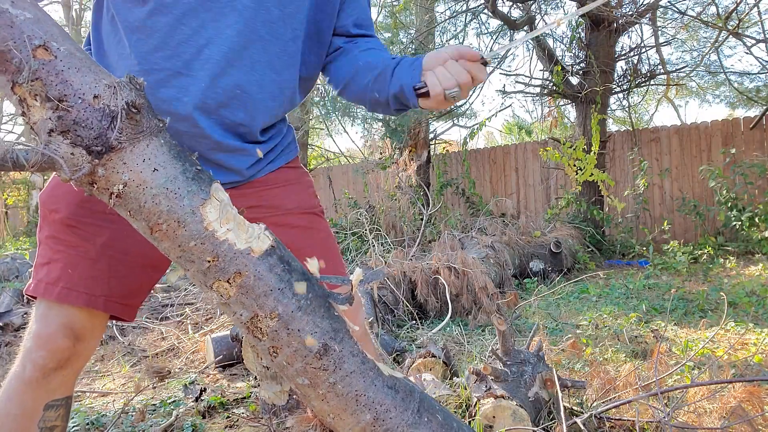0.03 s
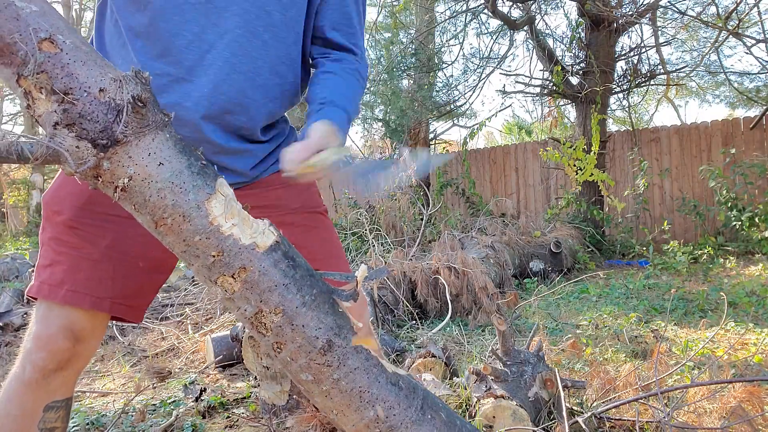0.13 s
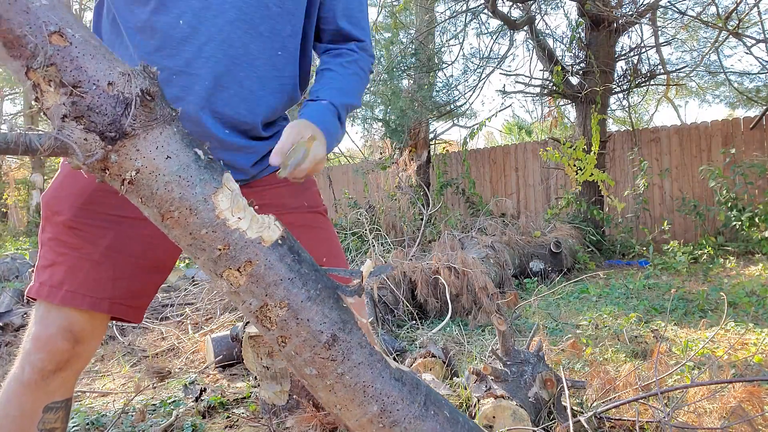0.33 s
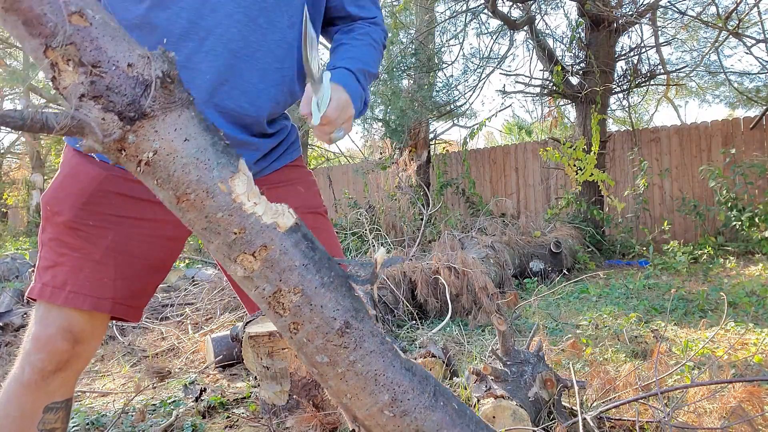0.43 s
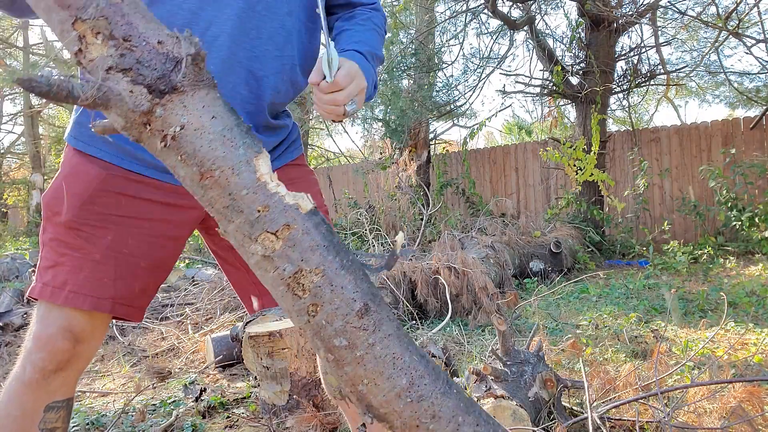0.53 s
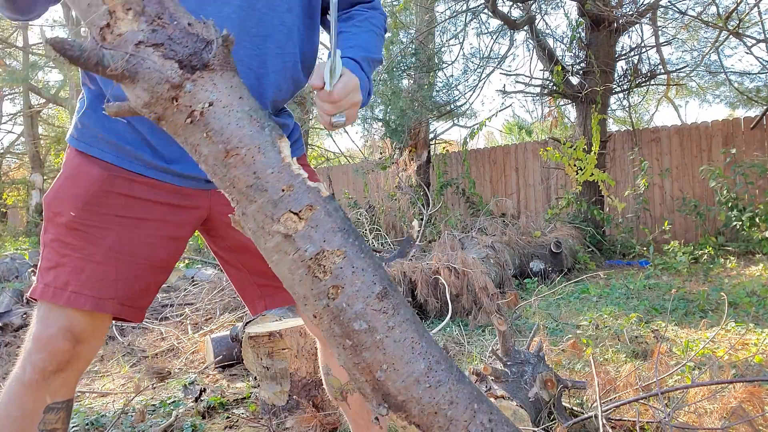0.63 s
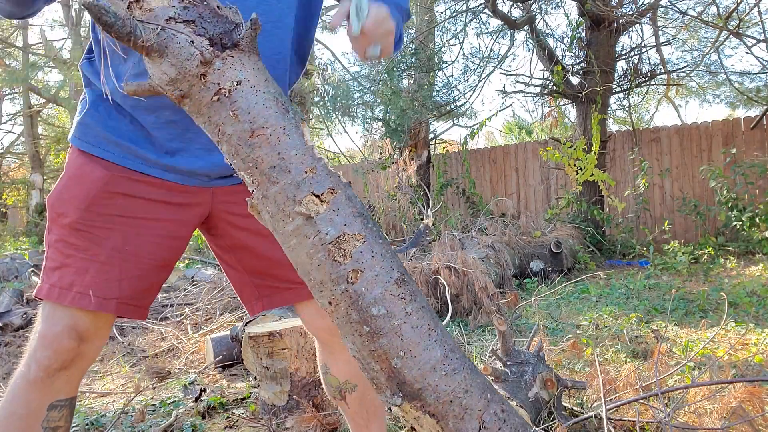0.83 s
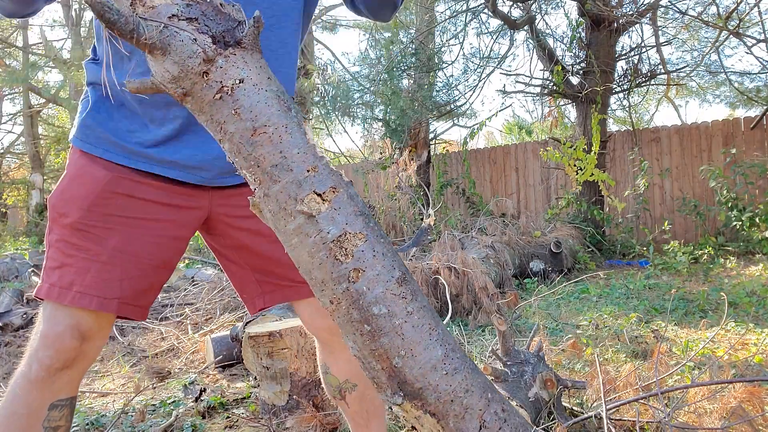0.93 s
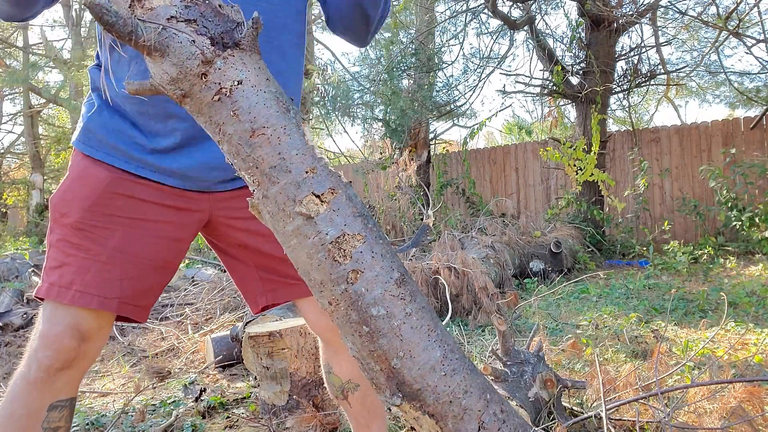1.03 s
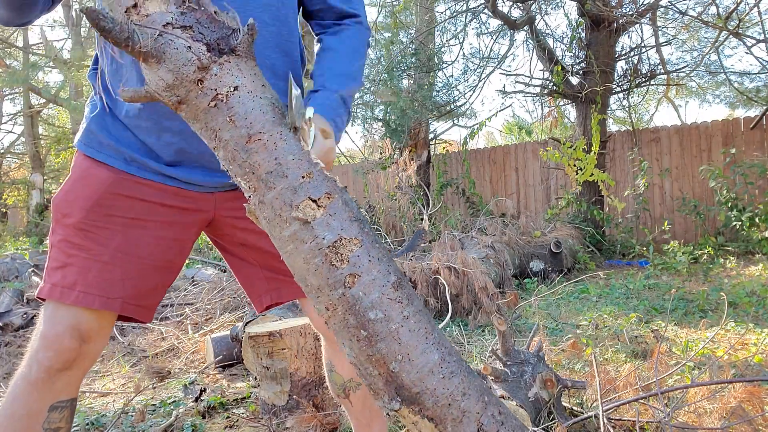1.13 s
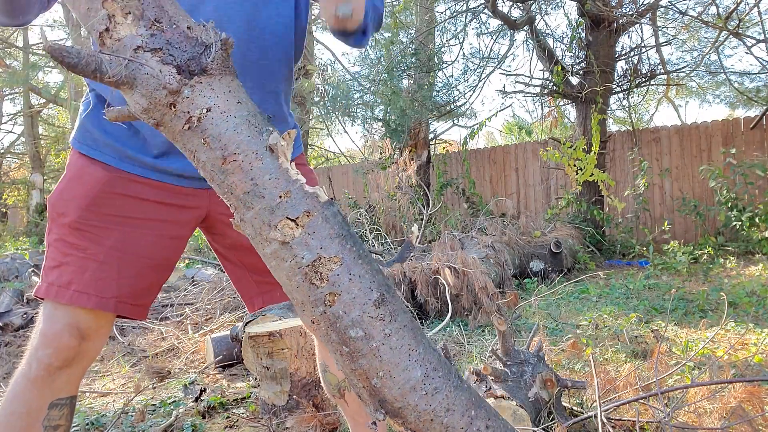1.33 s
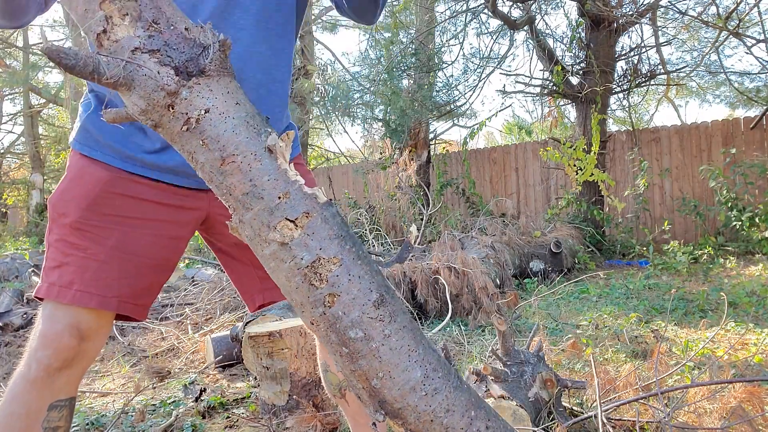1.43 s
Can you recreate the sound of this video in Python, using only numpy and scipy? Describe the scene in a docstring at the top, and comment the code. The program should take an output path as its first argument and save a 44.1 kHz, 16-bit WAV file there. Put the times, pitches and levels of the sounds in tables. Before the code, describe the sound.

A heavy knife blade chops into a log with a sharp splitting crack and short clank, chips and clothing rustle faintly, then a second chop lands; close stereo microphone, quiet backyard with a quick fence slap.

```python
"""A large knife chops twice into a leaning log in a back yard, heard from close by.
Each blow is a burst of tiny clicks (splitting fibres) plus fading tones (the ringing blade and log).
Soft noise swells up just before each blow; a fence slaps the blow back and the yard scatters it.
Shaped grains make the pattering chips and rustling clothes between the blows.
Noise held near two low pitches makes a distant hum, and shaped noise makes faint outdoor air."""
import sys
import numpy as np
from scipy import signal
from scipy.fft import rfft, irfft
from scipy.io import wavfile
from scipy.ndimage import uniform_filter1d

SR = 44100
rng = np.random.default_rng(int(sys.argv[2]) if len(sys.argv) > 2 else 0)


def generate_wav(signal):
    """Clip the signal to [-1, 1] and save it as 16-bit WAV at the path in sys.argv[1]."""
    frames = np.transpose(np.atleast_2d(signal))
    scaled = np.clip(frames, -1, 1) * 32767
    pcm = np.round(scaled).astype(np.int16)
    wavfile.write(sys.argv[1], SR, pcm)


N = 66150  # length in samples: 1.5 s
T = np.arange(N) / SR  # time in seconds

# A t60 is the time a sound takes to fade by 60 dB. A pan is left minus right in dB.
# Colour tables give relative strength; sounds are set to their level afterwards.

# Distant hum: pitch_hz, width_hz, level_db
HUM_TONES = [(60.65, 6.5, -53), (121.6, 7.2, -63)]
# Colour of the outdoor air: pitch_hz, level_db (per Hz)
AIR_COLOUR = [(20, -7), (70, 0.5), (200, -12.5), (400, -24.5), (1000, -27.5), (2200, -28.5), (3800, -33),
              (5800, -30), (9500, -41.5), (13000, -33), (15500, -32.5)]
AIR_DB, AIR_WIDE_HZ, AIR_SWELL_DB = -55, 900, -1.18

# Rustles of clothes and dry litter: start_s, length_s, level_db, pan_db, tilt_db (per octave)
RUSTLE_EVENTS = [(.005, 0.13, -60, -2, -8.5), (0.501, 0.28, -56, 1.5, -3), (0.75, 0.22, -60, -3.5, -6),
                 (1.011, 0.24, -58.5, 0, -8), (1.339, 0.038, -53.5, -1.5, -10)]
# Colour of a rustle before its tilt: pitch_hz, level_db (per Hz)
RUSTLE_COLOUR = [(100, -75), (700, -33), (3800, -10.5), (5500, -2.5), (7500, -3), (9500, -13), (13000, 4.5),
                 (15500, -1)]
RUSTLE_ATTACK_S, RUSTLE_GRAINS_PER_S, RUSTLE_SPREAD_DB = 0.0073, 7000, 5
FLUTTER_DB = 2.5
SMALL_WIDTH = 0.92  # stereo width of rustles and chips

# Faint ring of the lifted blade: start_s, pitch_hz, width_hz, level_db, t60_s
LIFTED_BLADE_RING = (.015, 1990, 600, -63.5, .45)

# Chips landing and bark snapping: start_s, level_db, pan_db, t60_s, pitch_hz
CHIP_EVENTS = [(.057, -40.5, -5, 0.015, 1970), (.287, -66, 4, 0.025, 2140), (0.302, -56, 0, 0.065, 1420),
               (0.3288, -46.5, 9.5, 0.035, 7300), (0.4606, -52.5, -2, 0.024, 7930),
               (0.5157, -53, 4, 0.21, 6560), (0.7258, -48.5, -2, .013, 7100), (0.7546, -48, 5, 0.046, 6940),
               (0.823, -44, 3, 0.036, 5500), (1.0085, -36.5, -2.5, 0.016, 5200),
               (1.0188, -41.5, -3.5, 0.063, 4960), (1.05, -47.5, -3, 0.11, 6340),
               (1.119, -52, -2, 0.044, 5000), (1.288, -53, 7, 0.031, 3150), (1.363, -49.5, 9, 0.052, 6550),
               (1.37, -44.5, -13, 0.026, 5170)]
# Colour of a chip before its own ring: pitch_hz, level_db (per Hz)
CHIP_COLOUR = [(1000, -19), (2600, 5.5), (7500, 1.5), (9500, -6), (13000, 5)]
CHIP_RING_DB, CHIP_RING_OCTAVES = 14, 0.2  # height of the ring's peak, reach to either side

# Colour of the soft noise around each blow: pitch_hz, level_db (per Hz)
LEAD_IN_COLOUR = [(100, -7), (3200, -1), (10000, -14.5), (15000, -7)]
LEAD_IN_DB, LEAD_IN_RISE_S, LEAD_IN_STOP_S = -33, 0.0096, 0.0031

# Knife blows: start_s, crack_db, log_db, blade_db, echo_db, place (along the cut, 0 to 1),
# lag_s (until the log moves), grip_s (until the wood grips the edge), echo_s (until the fence answers)
BLOW_EVENTS = [(.2236, -14, -20.5, -17.5, -20.5, 0, .0001, 0.021, .0229),
               (1.1782, -13, -19, -19, -16.5, 0.98, 0.00097, .008, .0234)]
# Tones of the log: pitch_hz, t60_s, near_db (struck at one end of the cut), far_db (at the other)
LOG_MODES = [(125.4, 0.19, -7, -13), (199.5, 0.063, 1, -14), (250.8, 0.15, -10.5, -17.5),
             (312, 0.15, -11.5, -7.5), (360.5, 0.092, -2.5, 0.86), (368.3, 0.078, 8, -3),
             (518, 0.15, -5.5, -26.5), (557.3, 0.11, -5.5, -0.8), (755, 0.096, -3.5, -6.5),
             (847.4, 0.095, -5.5, -6), (862, 0.14, -15, -12), (947, 0.034, 5.5, 0.5),
             (1093, 0.022, 5.5, -7.5), (1134, 0.051, 1, -2.5), (1403, 0.066, -15.5, -6)]
# Tones of the blade, damped by the wood: pitch_hz, t60_s, near_db, far_db (ends of the cut)
BLADE_MODES = [(1572, 0.028, -3.5, -18.5), (1954, 0.03, 2.5, -4), (2068, 0.028, 4.5, 3.5),
               (2527, 0.035, -2, 0), (3021, 0.052, -18.5, 0.5), (3312, 0.04, -3, 4.5),
               (3627, 0.056, -6.5, -1.5), (4350, 0.021, 3, -6.5), (6750, 0.016, 1.5, 6.5)]
# Colour of the splitting fibres: pitch_hz, level_db (per Hz)
CRACK_COLOUR = [(60, -38.5), (300, -6.5), (650, -11), (950, -3), (1400, -12), (2200, 0), (4000, -5.5),
                (7300, -5.5), (9500, -18), (15500, -12)]
RISE_S, BITE_S, CRACK_T60_S = 0.0013, 0.0013, 0.033  # build-up, full-strength hold, then fade
GRAINS_PER_S, GRAIN_SPREAD_DB = 12000, 2.5
CRACK_WIDTH, BLADE_WIDTH, BLOW_PAN_DB = 0.82, 0.33, -1
LOG_PUSH_S = 0.00077  # how gradually the log is set moving
WAVER_HZ, WAVER_S = 60, 0.06  # bandwidth of the pitch waver, time it takes to grow

# Scatter from further stretches of fence: delay_s (after the slap), t60_s (smear), level_db
FENCE_ECHOES = [(.002, 0.082, -1.5), (0.032, 0.098, -11.5)]
FENCE_LOW_HZ, SLAP_DB = 695, 1

# Colour of the yard's scatter: pitch_hz, level_db
YARD_COLOUR = [(100, 6), (300, 2.5), (1500, 7.5), (2500, -2.5), (6500, -5), (10000, -11), (15000, 1)]
YARD_DB, YARD_T60_S, YARD_ONSET_S = -21.5, 0.29, 0.028
GROUND_DB, GROUND_T60_S, GROUND_TILT_DB = -10, 0.11, -1.25  # tilt is per octave
KNOCK_SCATTER_DB = -13  # how much of the log's knock reaches the yard

TOP_HZ, CEILING = 15850, 0.9  # highest pitch kept, peak limit


def undb(db):
    """Turn decibels into a multiplying gain."""
    return 10 ** (np.asarray(db) / 20)


def unit(x):
    """Scale a sound to an average strength (rms) of 1."""
    return x / np.sqrt(np.mean(x ** 2) + 1e-18)


def fade(t, t60):
    """Silence before t = 0, then a steady fade in dB."""
    return (t >= 0) * np.exp(-np.log(1000) * np.maximum(t, 0) / t60)


def pan(db):
    """Left and right gains for a level difference."""
    return undb(np.array([[db], [-db]]) / 2)


def spread(mid, side, width):
    """Build left and right from a shared part and an opposed part."""
    opposed = width * side * np.array([[1], [-1]])
    return (mid + opposed) / np.sqrt(1 + width ** 2)


def colour(x, points, tilt_db=0):
    """Filter a sound by (Hz, dB) points and a tilt per octave."""
    hz, db = np.array(points).T
    octave = np.log2(np.maximum(np.fft.rfftfreq(N, 1 / SR), 1))
    tilt = tilt_db * np.clip(octave, np.log2(hz[0]), None)
    gain_db = np.interp(octave, np.log2(hz), db) + tilt
    return irfft(rfft(x) * undb(gain_db), N)


def grains(rate, spread_db):
    """Make tiny clicks of uneven size at random moments."""
    hits = rng.random(N) < rate / SR
    signs = rng.choice([-1, 1], N)
    size_db = spread_db * np.minimum(rng.exponential(size=N), 4)
    return hits * signs * undb(size_db)


def crackle(points, rate, spread_db, width, tilt_db=0):
    """Make coloured stereo grains with an rms of 1."""
    shared, opposed = grains(rate, spread_db), grains(rate, spread_db)
    return unit(colour(spread(shared, opposed, width), points, tilt_db))


def narrow(hz, width):
    """Make noise held near one pitch, with an rms of 1."""
    f = np.fft.rfftfreq(N, 1 / SR)
    random_phase = np.exp(2j * np.pi * rng.random(len(f)))
    peak = 1 / (1 + (2 * (f - hz) / width) ** 2)
    return unit(irfft(random_phase * peak, N))


def convolve(x, response):
    """Pass a sound through an echo pattern of unit energy."""
    return signal.fftconvolve(x, unit(response) / np.sqrt(N), axes=-1)[:, :N]


def late(x, seconds):
    """Delay a sound, even by part of a sample, by turning its phases."""
    f = np.fft.rfftfreq(N, 1 / SR)
    return irfft(rfft(x) * np.exp(-2j * np.pi * f * seconds), N)


def outdoors():
    """Wavering hum and soft, swelling air: centred in the bass and wide in the treble."""
    f = np.fft.rfftfreq(N, 1 / SR)
    hum = sum(undb(db) * narrow(hz, width) for hz, width, db in HUM_TONES)
    mid, side = rng.standard_normal((2, N))
    side = irfft(rfft(side) * np.clip(f / AIR_WIDE_HZ, 0.25, 1), N)
    swell = np.interp(T, np.linspace(0, T[-1], 16), rng.standard_normal(16))
    air = unit(colour(spread(mid, side, width=1.0), AIR_COLOUR))
    return hum + undb(AIR_DB + AIR_SWELL_DB * swell) * air


def rustles():
    """Rubbing cloth and litter shed tiny clicks: each movement starts fast, flutters and dies away."""
    out = 0
    for start, length, db, pan_db, tilt_db in RUSTLE_EVENTS:
        corners = [0, RUSTLE_ATTACK_S, RUSTLE_ATTACK_S + length]
        effort = np.sqrt(np.interp(T - start, corners, [0, 1, 0]))
        flutter = unit(uniform_filter1d(rng.standard_normal(N), size=500))
        effort = effort * undb(FLUTTER_DB * flutter)
        rub = crackle(RUSTLE_COLOUR, RUSTLE_GRAINS_PER_S, RUSTLE_SPREAD_DB, SMALL_WIDTH, tilt_db)
        out = out + undb(db) * pan(pan_db) * effort * rub
    return out


def lifted_blade():
    """The lifted blade rings faintly: noise held near one pitch that dies away."""
    start, hz, width, db, t60 = LIFTED_BLADE_RING
    return undb(db) * fade(T - start, t60) * narrow(hz, width)


def chips():
    """Small dry ticks of wood and bark; each piece rings at a pitch set by its size."""
    grit = crackle(CHIP_COLOUR, rate=5800, spread_db=5, width=SMALL_WIDTH)
    out = 0
    for start, db, pan_db, t60, hz in CHIP_EVENTS:
        reach = 2 ** CHIP_RING_OCTAVES
        body = [(hz / reach, 0), (hz, CHIP_RING_DB), (hz * reach, 0)]
        tick = fade(T - start, t60) * unit(colour(grit, body))
        out = out + undb(db) * pan(pan_db) * tick
    return out


def lead_ins():
    """Soft noise swells up just before each blow and stops quickly after it."""
    swell = 0
    for blow in BLOW_EVENTS:
        before, after = (blow[0] - T) / LEAD_IN_RISE_S, (T - blow[0]) / LEAD_IN_STOP_S
        swell = swell + np.exp(-np.maximum(before, after))
    hiss = unit(colour(spread(*rng.standard_normal((2, N)), width=0.83), LEAD_IN_COLOUR))
    return undb(LEAD_IN_DB) * swell * hiss


def ring(modes, t, place, width):
    """Fading, wavering tones of a struck body; the place of the blow sets how strong each one is."""
    out = 0
    for k, (hz, t60, near_db, far_db) in enumerate(modes):
        waver = np.clip(t / WAVER_S, 0, 1) * narrow(0, WAVER_HZ)
        phase = 2 * np.pi * hz * t + waver
        db = near_db + np.clip(place, 0, 1) * (far_db - near_db)
        # The opposed part gives each ear its own phase.
        tone = spread(np.sin(phase), rng.choice([-1, 1]) * np.cos(phase), width)
        out = out + (-1) ** k * undb(db) * fade(t, t60) * tone
    return out


def chops():
    """The edge bites through fibres and rings until the wood grips it, and the log rings on."""
    direct, scattered, slaps, carried = 0, 0, 0, 0
    for start, crack_db, log_db, blade_db, echo_db, place, lag, grip_s, echo_s in BLOW_EVENTS:
        t = T - start
        free = 1 / (1 + (t / grip_s) ** 4)  # falls as the wood grips the edge
        build_up = np.exp(np.minimum(t, 0) / RISE_S)
        bite = free * build_up * fade(np.maximum(t - BITE_S, 0), CRACK_T60_S)
        fibres = crackle(CRACK_COLOUR, GRAINS_PER_S, GRAIN_SPREAD_DB, CRACK_WIDTH)
        crack = undb(crack_db) * bite * fibres
        push = 1 - np.exp(-np.maximum(t - lag, 0) / LOG_PUSH_S)
        knock = undb(log_db) * push * ring(LOG_MODES, t - lag, place, width=0.062)
        clank = undb(blade_db) * free * ring(BLADE_MODES, t, place, BLADE_WIDTH)
        direct = direct + crack + knock + clank
        scattered = scattered + crack + undb(KNOCK_SCATTER_DB) * knock
        # The sharp slap returns crack and blade; the smeared echo carries only the crack.
        slaps = slaps + undb(echo_db) * late(crack + clank, echo_s)
        carried = carried + undb(echo_db) * late(crack, echo_s)
    return direct, scattered, slaps, carried


def fence(slaps, cracks):
    """One sharp slap from the nearest boards, then the crack smeared by those further along."""
    boards = 0
    for delay, t60, db in FENCE_ECHOES:
        bounces = np.array([grains(2500, 2), grains(2300, 0.92)])
        boards = boards + undb(db) * unit(bounces * fade(T - delay, t60))
    echo = undb(SLAP_DB) * slaps + convolve(cracks, boards)
    bass_cut = signal.butter(1, FENCE_LOW_HZ, "high", fs=SR, output="sos")
    return signal.sosfilt(bass_cut, echo)


def yard(x):
    """Quick scatter from the ground and log pile, then a thin, uneven tail from trees."""
    ground = colour(spread(*rng.standard_normal((2, N)), width=0.3), YARD_COLOUR, GROUND_TILT_DB)
    trees = crackle(YARD_COLOUR, rate=1000, spread_db=4.5, width=1.0)
    near = convolve(x, ground * fade(T, GROUND_T60_S))
    tail = convolve(x, trees * fade(T - YARD_ONSET_S, YARD_T60_S))
    return undb(GROUND_DB) * near + undb(YARD_DB) * tail


def scene():
    """Add the outdoor floor, small movements, lead-in noise, and blows with their echoes."""
    direct, scattered, slaps, carried = chops()
    quiet = outdoors() + rustles() + lifted_blade() + chips() + lead_ins()
    return quiet + direct * pan(BLOW_PAN_DB) + fence(slaps, carried) + yard(scattered)


def record(dry):
    """Flatten any peaks beyond the ceiling, then cut the highest treble steeply."""
    clipped = np.clip(dry, -CEILING, CEILING)
    treble_cut = signal.ellip(10, 0.2, 80, TOP_HZ, fs=SR, output="sos")
    return signal.sosfilt(treble_cut, clipped)


dry = scene()
out = record(dry)
generate_wav(out)
```